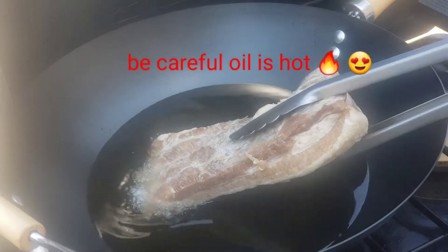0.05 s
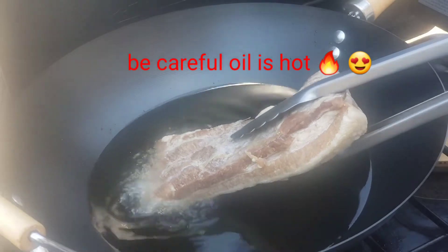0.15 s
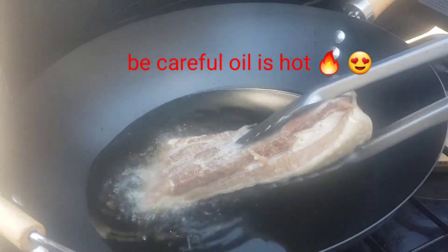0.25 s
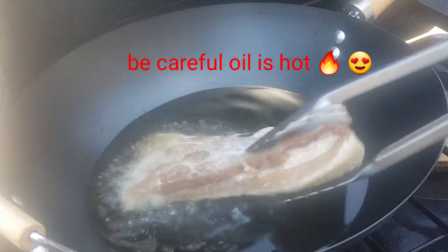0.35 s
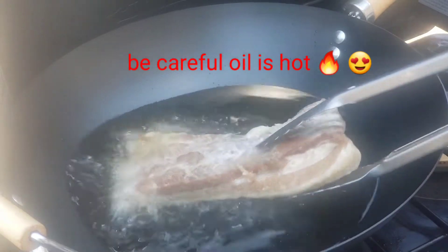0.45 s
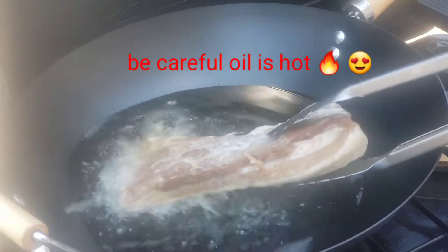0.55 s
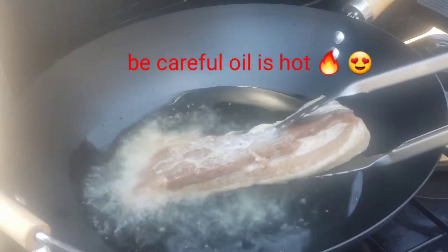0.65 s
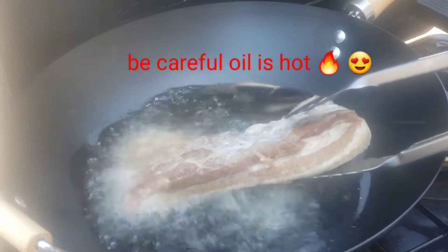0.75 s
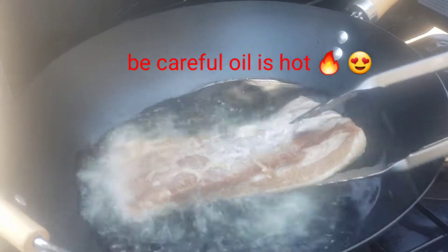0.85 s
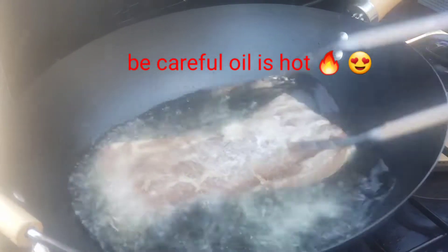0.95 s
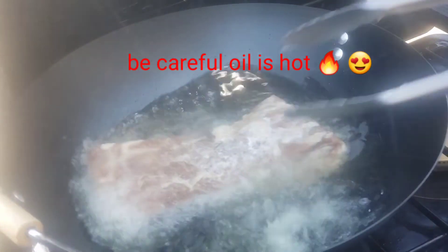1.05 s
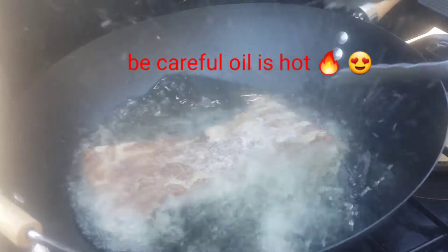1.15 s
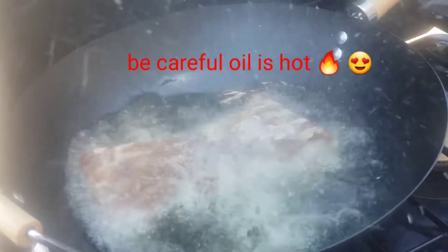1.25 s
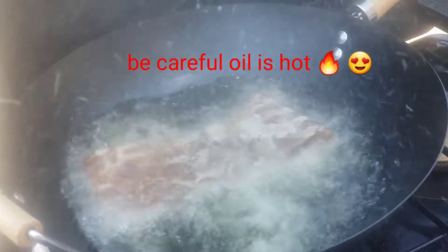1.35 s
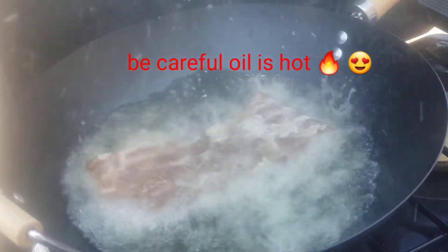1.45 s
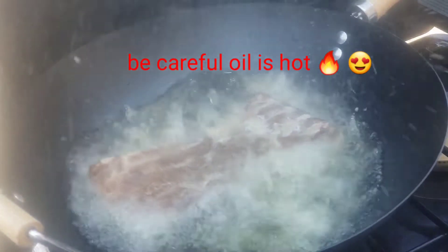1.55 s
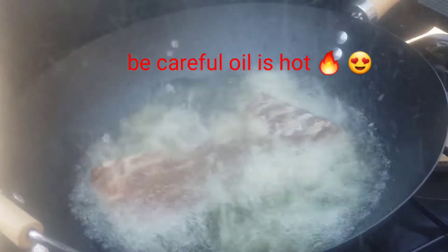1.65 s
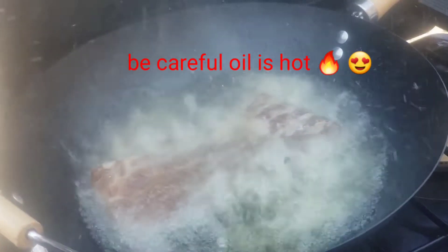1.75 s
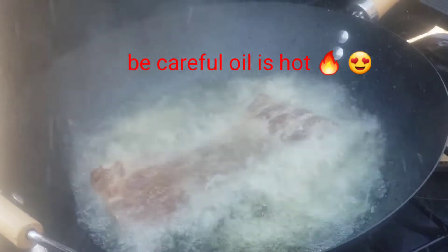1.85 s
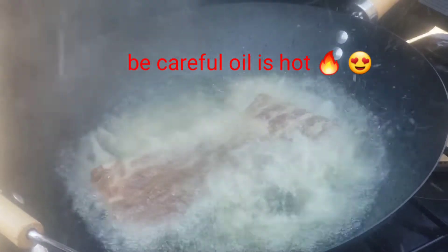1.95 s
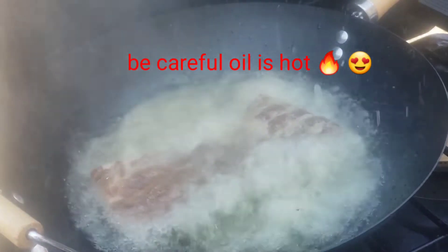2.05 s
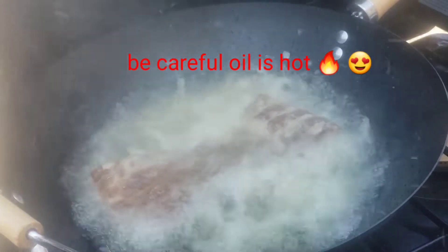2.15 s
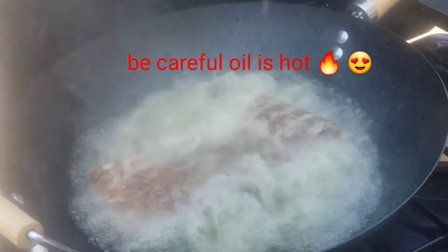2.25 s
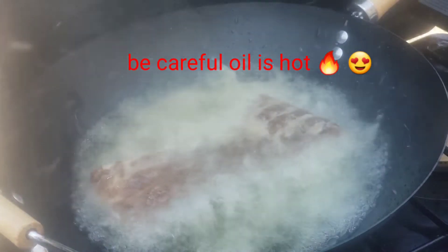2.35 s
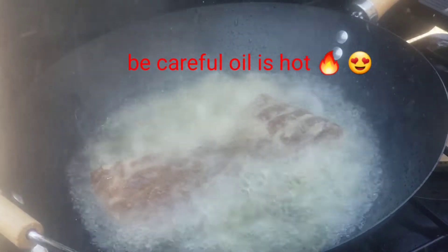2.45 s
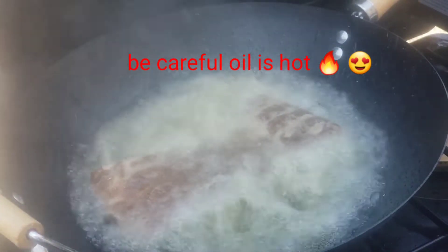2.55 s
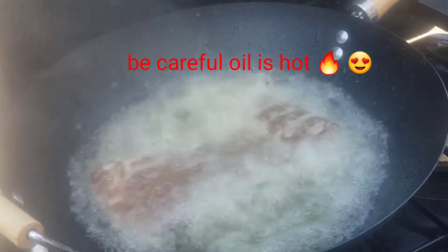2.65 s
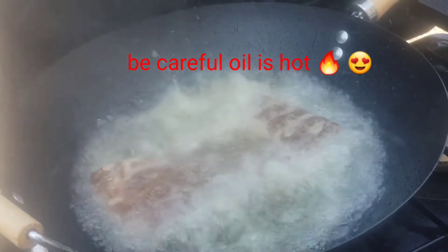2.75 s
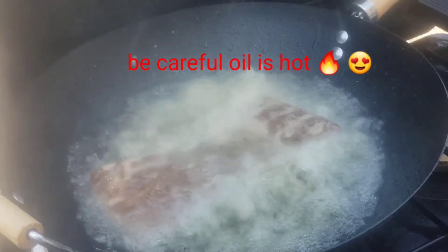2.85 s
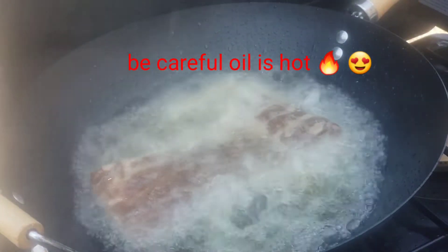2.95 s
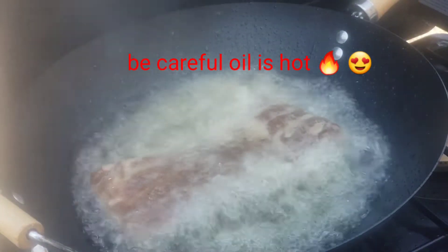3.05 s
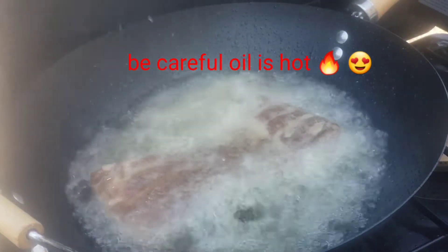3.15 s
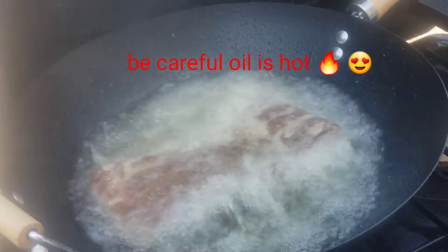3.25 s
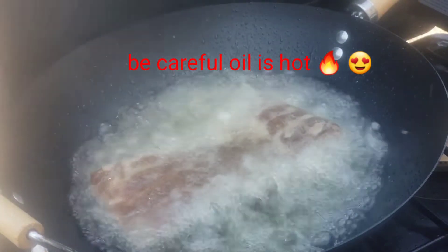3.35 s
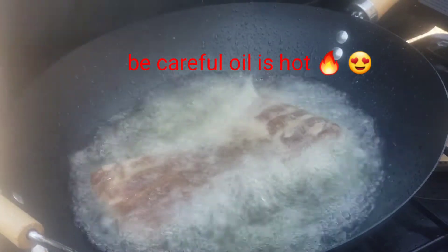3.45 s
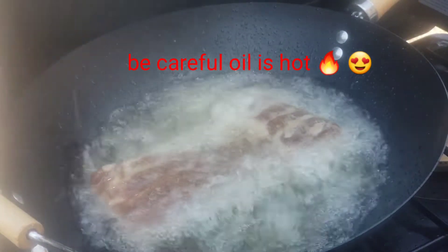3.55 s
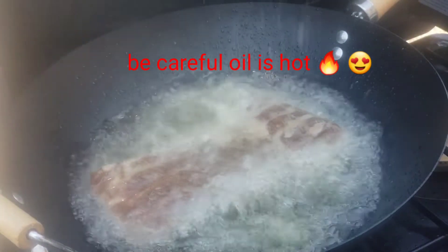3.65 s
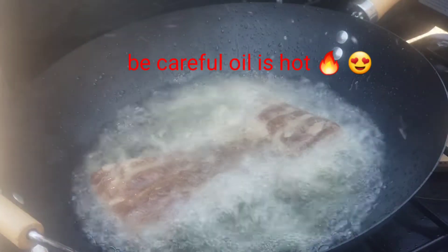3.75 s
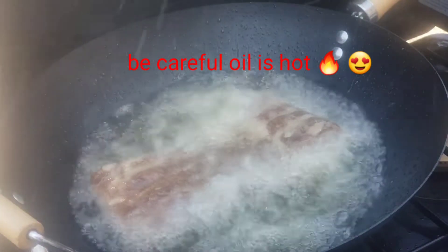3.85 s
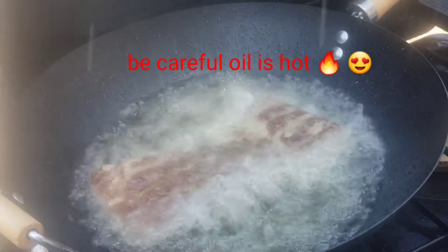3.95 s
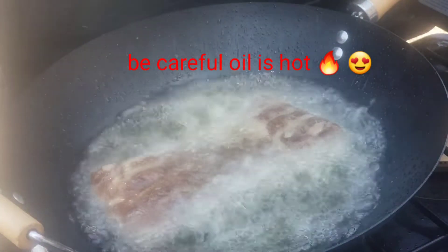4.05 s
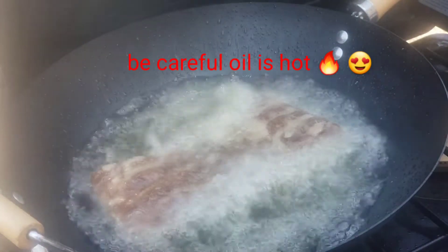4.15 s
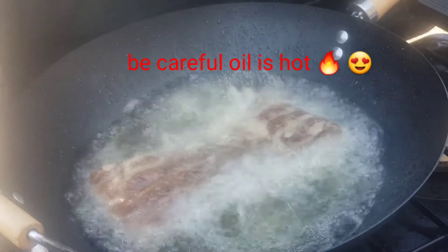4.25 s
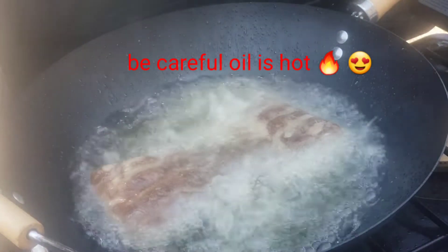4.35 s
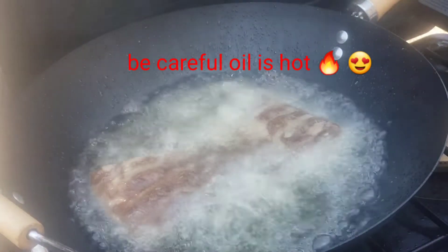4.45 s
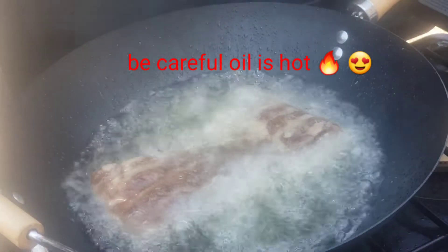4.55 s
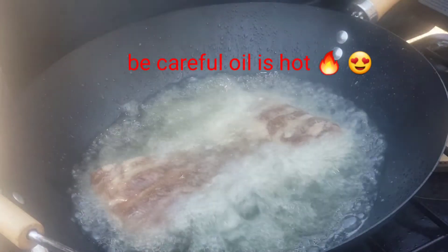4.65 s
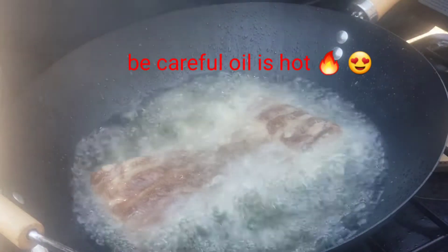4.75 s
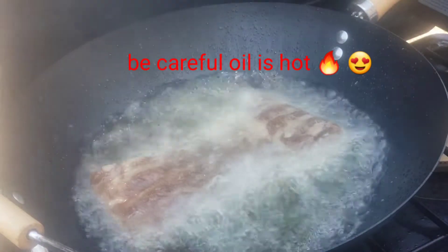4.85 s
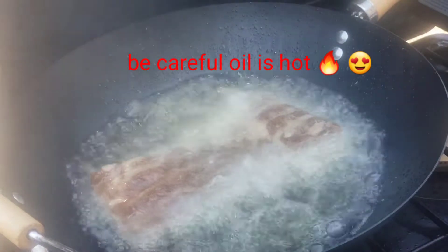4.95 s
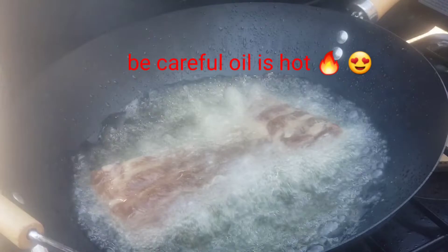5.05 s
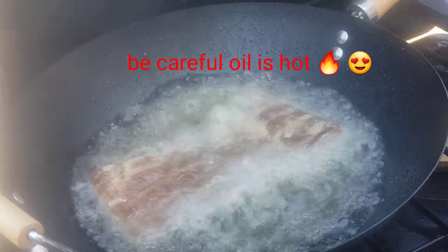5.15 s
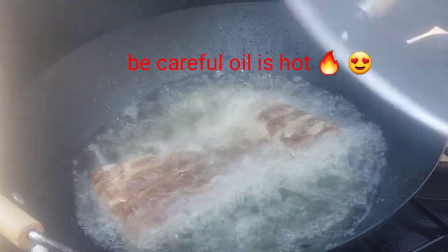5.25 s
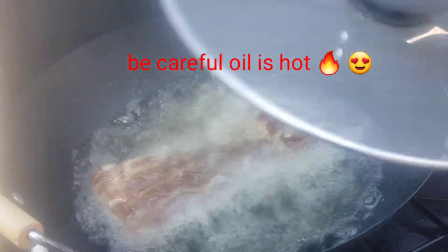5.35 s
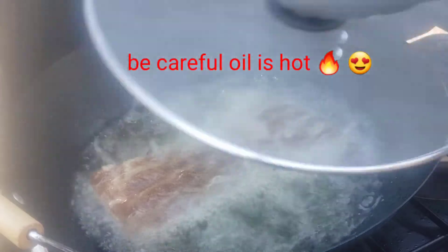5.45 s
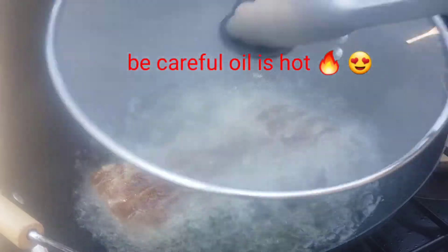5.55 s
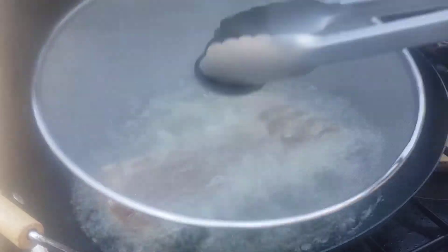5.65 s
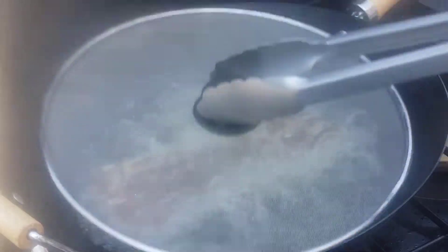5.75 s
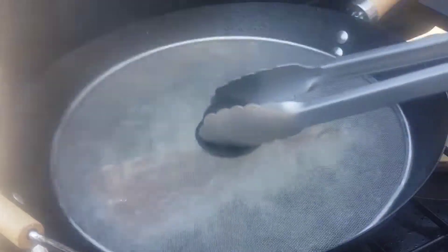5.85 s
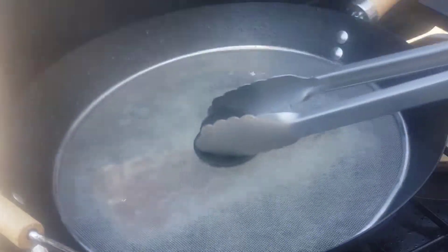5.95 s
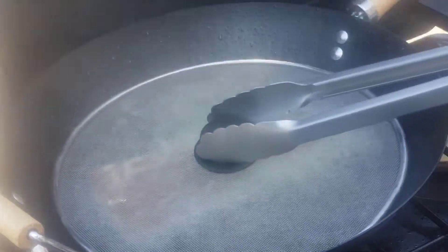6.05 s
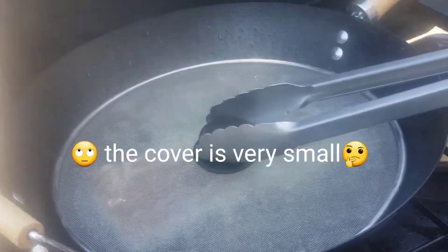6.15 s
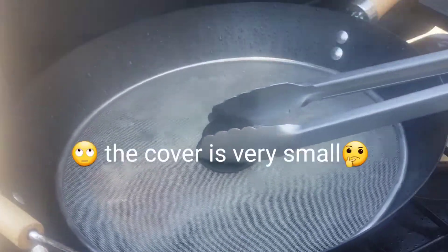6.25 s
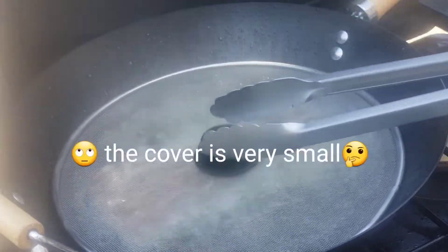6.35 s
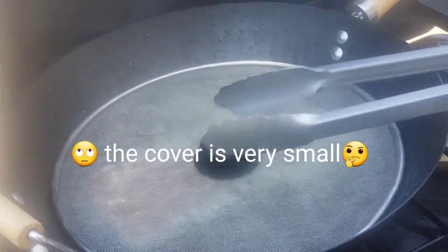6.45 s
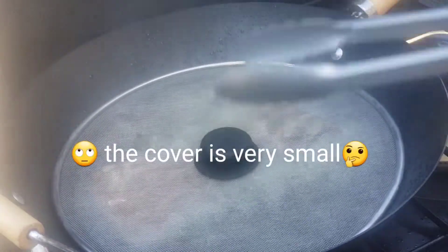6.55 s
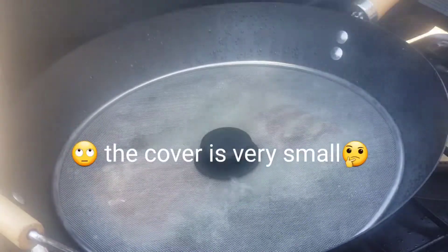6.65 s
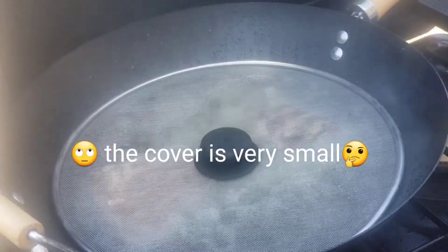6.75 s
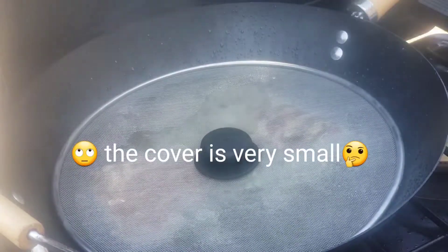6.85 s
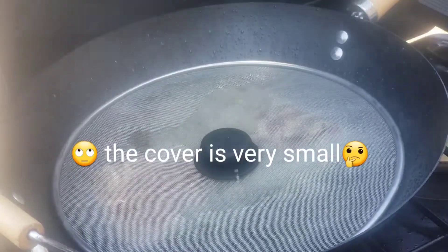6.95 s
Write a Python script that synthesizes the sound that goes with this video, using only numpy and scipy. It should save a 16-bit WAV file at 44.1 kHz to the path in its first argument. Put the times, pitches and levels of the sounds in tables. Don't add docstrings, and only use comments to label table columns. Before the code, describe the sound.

Close frying sound in a steel wok, with almost no room around it. At 0 s there is a modest fizz; from about 0.25 s wet meat touching the oil crackles sharply, and by 0.75 s the sizzle swells into a dense, bright roar. From 1.1 to 3 s it stays loud and turbulent: steady hiss, countless fine snaps, hard spitting cracks around 1.3, 1.8, 2.2 and 2.7 s, and hollow, mid-pitched bubbling and gurgling below the oil. The hardest cracks jolt and briefly squash the sound. Around 2.7 s the hiss begins thinning, and after 3.3 s single snaps and short hollow pops stand apart over a softening fizz. From 5 to 7 s it is a quiet, irregular crackle, with faint low air puffs as a lid arrives near 6 s, and a somewhat stronger crack around 6.5 s. The bowl adds a slight metallic ring.

```python
import sys
import numpy as np
from scipy import signal
from scipy.fft import rfft, irfft, next_fast_len
from scipy.io import wavfile
from scipy.ndimage import uniform_filter1d, minimum_filter1d, map_coordinates

SR = 44100
rng = np.random.default_rng(int(sys.argv[2]) if len(sys.argv) > 2 else 0)


def gain_from_decibels(decibels):
    exponent = np.asarray(decibels, float) / 20
    return 10 ** exponent


def wav_record(signal):
    frames = np.transpose(np.atleast_2d(signal))
    bounded = np.clip(frames, -1, 1)
    quanta = np.round(bounded * 32767).astype(np.int16)
    wavfile.write(sys.argv[1], SR, quanta)


N = 308259

# time_s, surface_db, under_db
BOILING = [(0, -27, -35), (.27, -21.5, -39), (.56, -20.5, -22.5), (.76, -16.5, -20), (1.13, -19, -22),
           (1.58, -18.5, -23.5), (2, -19.5, -25), (2.32, -21, -25), (2.53, -20.5, -24.5), (2.7, -25, -20.5),
           (3.08, -24, -28.5), (3.72, -27.5, -31), (4.17, -29, -33.5), (4.7, -31.5, -35), (5.4, -30, -35),
           (5.68, -28.5, -43), (6.0, -31, -36), (6.99, -31, -40.5)]
# frequency_hz, density_db (per Hz)
FIZZ_COLOUR = [(150, -19.5), (600, -14.5), (1100, -6), (2000, -1.5), (4400, -1.5), (7500, -8), (10500, -16),
               (14700, -23), (16500, -37)]
# frequency_hz, gain_db
SPRAY_COLOUR = [(800, -25), (2000, 5.5), (4000, 3.5), (8000, 10), (11000, 3.5), (15000, -5.5), (16500, -36)]
# start_s, peak_db, pitch_hz
DROPS = [(0.1693, -4.5, 6600), (0.277, 5, 8450), (0.3839, -4, 7440), (0.5568, 14, 9800),
         (1.1762, 10, 6050), (1.274, 23, 9440), (1.3572, 15, 7100), (1.4983, 9, 7650),
         (1.6746, 1, 7240), (1.802, 16, 6200), (1.8211, 5, 7250), (1.9541, 15, 7250),
         (2.0132, -7, 8300), (2.2047, 10, 8500), (2.2776, -8, 6720), (2.311, 1, 4970),
         (2.4003, -2, 5800), (2.5125, 2, 5430), (2.5342, -5, 6700), (2.613, -3.5, 8450),
         (2.6996, 14, 4650), (2.7792, 12, 7530), (2.8052, 8, 5900), (2.8294, -7, 6800),
         (2.8534, 10, 6450), (2.884, 9, 8300), (2.956, 4, 6960), (3.1228, -5, 6700), (3.169, -3, 8300),
         (3.2496, -7, 7060),
         (3.386, -3, 6000), (3.408, -4, 6450), (3.4365, 12, 7100), (3.5082, -16, 4660),
              (3.974, -5, 6300), (4.029, 0, 8190), (4.037, -3, 8050), (4.1287, -5.5, 6570),
              (4.2064, -4, 7200), (4.2896, -11, 5000), (4.474, -4, 7150), (4.5417, 3, 8300),
              (4.6365, -13, 7100), (4.7861, -2, 7800), (4.9251, -7.5, 6700), (5.2484, -10, 3630),
              (5.359, -5, 8400), (5.4056, -8.5, 7600), (5.5195, -3, 8700), (5.5813, -11.5, 6700),
              (5.826, -8, 5520), (6.0096, -6, 6120), (6.027, -6.5, 7860), (6.1729, -1, 7600),
              (6.3244, -10, 6200), (6.394, -3, 8270), (6.5035, 7, 6160), (6.6871, -3.5, 5300),
              (6.766, -4, 7360), (6.7781, 1, 8800),
         (3.2157, -11, 7890), (3.2346, -3, 8600), (3.3455, -3, 5140), (3.6986, -10, 7290),
               (3.958, -11.5, 6600), (4.0237, -8, 6620), (4.2718, -11, 6580), (4.388, -21, 3500),
               (4.644, -11, 4340), (4.7535, -13.5, 5200), (5.086, -22, 5260), (5.197, -14, 6340),
               (5.2918, -15.5, 5230), (5.4737, -19, 6880), (5.4998, -7, 4200), (5.555, -9.5, 9050),
               (5.7903, -14, 7400), (5.8869, -11.5, 5400), (5.983, -9, 7360), (6.192, -17, 9390),
               (6.518, -13, 5970), (6.603, -12.5, 5600), (6.631, -13, 3800), (6.72, -14, 7900),
               (6.729, -14, 4994), (6.757, -19, 5070), (6.7819, -5, 8600), (6.9416, -22, 7000)]
# time_s, pitch_hz
BUBBLE_PITCH = [(0, 2600), (.5, 2300), (1.1, 1930), (1.5, 1240), (3, 1170), (3.6, 1585), (7, 1593)]
# time_s, level_db (over the other bubbles)
HOLLOW_LEVEL = [(.4, -26), (.6, -4), (1.3, 0), (3.1, 1.5), (3.15, -16), (7, -23)]
# start_s, peak_db, pitch_hz
POCKETS = [(0.261, -2, 2930), (0.2947, 1, 2220), (0.4074, -2, 2280), (0.4217, -4, 2500),
           (0.4487, -5.5, 1870), (0.4623, -3, 2350), (0.5781, -6.5, 1200), (0.7487, -2, 1210),
           (0.7675, 10, 2500), (0.7796, -1, 1325), (0.871, -4, 2500), (0.9143, -7, 1570),
           (1.0772, -4, 1210), (1.1721, 1, 2550), (1.623, -7, 1050), (1.6387, -6, 2580),
           (1.8908, -10.5, 647), (1.9505, 1, 1420), (1.9624, -4.5, 1060), (1.9922, -7, 1350),
           (2.613, -1.5, 1060), (2.7236, -10, 1080), (2.775, 4, 1140), (3.0697, -5.5, 930),
           (3.0964, -7.5, 1700), (3.2552, -8, 633), (3.2728, -9.5, 1490), (3.4894, -10.5, 1400),
           (3.5171, -7.5, 1460), (3.667, -9.5, 835),
           (3.9872, -7.5, 1150), (4.146, -12, 1450), (4.2912, -12.5, 960), (4.3168, -7, 637),
                (4.3314, -5, 534), (4.517, -11.5, 1020), (4.6036, -6.5, 733), (4.7983, -11.5, 1210),
                (4.823, -15, 645), (4.9614, -13, 1250), (5.0608, -7.5, 1187), (5.1057, -10, 1830),
                (5.192, -6.5, 2900), (5.2471, -8.5, 1170), (5.4232, -12, 956), (5.4488, -6, 2620),
                (5.4852, -8.5, 1095), (5.5486, -11.5, 2150), (5.7856, -12, 1100), (5.9998, -11, 1680),
                (6.0905, -15.5, 1090), (6.1716, -11, 1340), (6.408, -7, 728), (6.4657, -7.5, 1330),
                (6.5269, -2, 1017), (6.6285, -12, 1830), (6.6862, -1.5, 1250), (6.8087, -5, 1170),
                (6.884, -10, 2700), (6.9507, -5.5, 1900),
           (3.3832, -7, 1830), (3.548, -11, 1290), (3.628, -19, 1230), (3.7532, -16, 1390),
                 (4.357, -12, 1500), (4.386, -17, 1500), (4.5948, -13, 1170), (3.8620, -17, 1220),
                 (4.0527, -18, 707), (4.1106, -13.5, 1800), (4.413, -21, 680), (4.551, -16, 1240),
                 (4.6616, -16, 1900), (4.776, -11, 2470), (4.8445, -14, 1730), (4.896, -9.5, 3580),
                 (5.009, -12, 1770), (5.1263, -11, 2330), (5.222, -22, 1220), (5.2846, -17, 1060),
                 (5.6073, -13, 2500), (5.647, -16.5, 1390), (5.7862, -12.5, 764), (5.8815, -13, 1540),
                 (6.136, -18, 1690), (6.355, -17, 960), (6.3656, -5.5, 3500), (6.635, -13, 2270),
                 (6.658, -20, 1090), (6.774, -13.5, 1050)]
# centre_hz, width_hz, level_db
BOWL_MODES = [(561.7, 20, -4), (1170, 216, 4), (1870, 150, -9), (2600, 100, -23.5), (4356, 91, 0.5)]
# delay_s, level_db
BOWL_ECHOES = [(.0004, -17), (.0008, -10.5), (.0015, -38), (.0029, -4), (.0042, -20)]
# start_s, level_db
JOLTS = [(0.541, -43), (1.17, -42), (1.267, -43), (1.353, -46), (2.04, -42), (2.399, -40), (2.855, -30),
         (3.248, -48), (3.436, -47), (4.038, -36.5), (4.128, -48), (4.786, -46), (5.519, -43), (6.009, -42)]
# frequency_hz, density_db (per Hz)
RUMBLE_COLOUR = [(18, -11), (30, -10.5), (60, -0.5), (100, -5.5), (140, -8), (250, -31), (400, -60)]
# centre_s, level_db, spread_s
LID_PUFFS = [
    (5.35, -75, 0.18),
    (6.0, -62, .06),
    (6.25, -66, .12),
    (6.65, -60, 0.2),
]

SUNK_S, SPENT_S, TURN_S = 1.12, 2.75, 0.16


def boil_surface(surge_db):
    fizz_db, _ = boiling_db()
    hiss = coloured_noise(FIZZ_COLOUR)
    snaps = swarm(count=10000, hz=[(0, 6320)], octaves=0.73, cycles=8.9, spread_db=5, cap_db=19.5, size=110)
    snaps = unit(coloured(snaps, SPRAY_COLOUR))
    hiss_db = fizz_db - 3 + 0.2 * (fizz_db + 23.5) + 1.13 * surge_db
    snaps_db = fizz_db - 1.0 + 0.08 * surge_db
    return gain_from_decibels(hiss_db) * hiss + gain_from_decibels(snaps_db) * snaps


def cracks():
    small = lesser(boiling_db()[0], count=110, over_db=15, spread_db=10, hz=[(0, 7000)], octaves=0.5)
    s, db, hz = np.vstack([DROPS, small]).T
    db = db + np.clip(db + 5, 0, 3.5)
    t = np.arange(700) / SR
    spray_envelope = gain_from_decibels(-13 - 60 * t / 0.006) + gain_from_decibels(-23 - 60 * t / 0.025)
    spray = scatter(s, db, spray_envelope)
    burst = rings(s, db + 16.0, hz, 5.15 / hz, 0.59, 0, size=160)
    edge = rings(s, db - 32, 4.3 * hz, 3 / hz, 0.78, 0, size=80)
    return burst + edge + spray


def boil_below(surge_db):
    _, bubble_db = boiling_db()
    gurgle_db = driven_db(base_db=-45.5, sunk_db=12.5, follows=0.36)
    bubbles = swarm(count=3000, hz=BUBBLE_PITCH, octaves=0.48, cycles=9.6, spread_db=5.5, cap_db=11.5, size=600)
    hollow = swarm(count=1000, hz=[(0, 1260), (3, 1123), (7, 1200)], octaves=0.11, cycles=24.0,
                   spread_db=1.0, cap_db=13.5, size=900)
    gurgle = swarm(count=1200, hz=[(0, 549)], octaves=0.27, cycles=4.1, spread_db=0.5, cap_db=6.0, size=900)
    hollow_db = np.interp(np.arange(N) / SR, *np.transpose(HOLLOW_LEVEL))
    bubbling = bubbles + gain_from_decibels(hollow_db - 4) * hollow
    return gain_from_decibels(bubble_db - 3 + 0.6 * surge_db) * bubbling + gain_from_decibels(gurgle_db - 1.5) * gurgle


def pops():
    small = lesser(boiling_db()[1], count=120, over_db=14.5, spread_db=7.5, hz=BUBBLE_PITCH, octaves=0.587)
    s, db, hz = np.vstack([POCKETS, small]).T
    t60 = 0.018 * (1200 / hz) ** 1.13
    sound = rings(s, db, hz, t60, 0.44, 0.034, size=2000)
    sound += rings(s, db - 19.0, 0.84 * hz, 4 * t60, 0.68, 0, size=4000)
    # octaves from the pocket's pitch, level dB
    for octave, piece_db in [(-0.5, -10), (0.5, -4), (1.2, -5), (2.1, -9.5)]:
        detune, delay, strength = rng.standard_normal((len(s), 3)).T
        pitch = hz * 2 ** (octave + 0.19 * detune)
        start = s + 0.0008 * np.abs(delay)
        piece_t60 = 0.76 * t60 * np.sqrt(hz / pitch)
        sound += rings(start, db + piece_db + 2.4 * strength, pitch, piece_t60, 0.53, 0.015, size=1200)
    t = np.arange(700) / SR
    return sound + scatter(s, db, gain_from_decibels(-37 - 60 * t / 0.029))


def bowl(x, ring_db, echo_db):
    def response(f):
        echoes = sum(gain_from_decibels(db) * np.exp(-2j * np.pi * f * s) for s, db in BOWL_ECHOES)
        modes = 0
        for k, (centre, width, db) in enumerate(BOWL_MODES):
            damping = 1j * f * width
            modes = modes + (-1) ** k * gain_from_decibels(db) * damping / (centre * centre - f * f + damping)
        return 1 + gain_from_decibels(echo_db) * echoes + gain_from_decibels(ring_db) * modes
    return filtered(x, response)


def jolts():
    t = np.arange(N) / SR
    push = 0
    for s, db in JOLTS:
        push = push - gain_from_decibels(db + 26) * np.maximum(t - s, 0) / 0.0033 * np.exp(-np.abs(t - s) / 0.0089)
    return filtered(push, lambda f: high_pass(f, corner_hz=72, order=4))


def air_rumble():
    t = np.arange(N) / SR
    air = gain_from_decibels(driven_db(base_db=-73.5, sunk_db=9.5, follows=0.58))
    for centre, db, spread in LID_PUFFS:
        air = air + gain_from_decibels(db) * np.exp(-((t - centre) / spread) ** 2)
    air_db = 20 * np.log10(air)
    return gain_from_decibels(air_db + 5.0 + 4.4 * wobble(11)) * coloured_noise(RUMBLE_COLOUR)


def boiling_db():
    s, surface, under = np.transpose(BOILING)
    t = np.arange(N) / SR
    return np.interp(t, s, surface), np.interp(t, s, under)


def driven_db(base_db, sunk_db, follows):
    t = np.arange(N) / SR
    sunk = (np.tanh((t - SUNK_S) / TURN_S) - np.tanh((t - SPENT_S) / TURN_S)) / 2
    surface_db, _ = boiling_db()
    return base_db + sunk_db * sunk + follows * (surface_db - surface_db.mean())


def lesser(bed_db, count, over_db, spread_db, hz, octaves):
    u = rng.random((count, 3))
    s = np.sort(u[:, 0]) ** 1.5 * N / SR
    db = bed_db[(s * SR).astype(int)] + over_db - spread_db * u[:, 1]
    pitch = np.interp(s, *np.transpose(hz)) * 2 ** (octaves * (2 * u[:, 2] - 1))
    return np.transpose([s, db, pitch])


def swarm(count, hz, octaves, cycles, spread_db, cap_db, size):
    u = rng.random((count, 2))
    g = rng.standard_normal((count, 2))
    s = u[:, 0] * N / SR
    pitch = np.interp(s, *np.transpose(hz)) * 2 ** (octaves * g[:, 0])
    db = np.minimum(-spread_db * np.log(u[:, 1] + 1e-9), cap_db)
    t60 = cycles * np.exp(0.31 * g[:, 1]) / pitch
    return unit(rings(s, db, pitch, t60, 0.18, 0.078, size))


def rings(s, db, hz, t60, rise, glide, size):
    t = np.arange(size) / SR
    s, db, hz, t60 = (np.reshape(v, (-1, 1)) for v in (s, db, hz, t60))
    phase = 2 * np.pi * np.clip(hz, 20, SR / 3) * t * (1 + glide * t / t60)
    onset = 1 - np.exp(-t * hz / rise)
    wave = -gain_from_decibels(db - 60 * t / t60) * np.sin(phase) * onset
    return placed(s, wave)


def scatter(s, db, envelope):
    noise = gain_from_decibels(db[:, None]) * envelope * rng.standard_normal((len(s), len(envelope)))
    return coloured(placed(s[:, None], noise), SPRAY_COLOUR)


def placed(s, waves):
    at = (s * SR).astype(int) + np.arange(waves.shape[1])
    return np.bincount(at.ravel(), waves.ravel(), N + SR)[:N]


def unit(x):
    return x / np.sqrt(np.mean(x ** 2) + 1e-20)


def wobble(rate):
    knots = rng.standard_normal(int(7 * rate) + 9)
    return map_coordinates(knots, [np.arange(N) * rate / SR])


def filtered(x, response):
    m = next_fast_len(N + SR // 2)
    return irfft(rfft(x, m) * response(np.fft.rfftfreq(m, 1 / SR)), m)[:N]


def coloured(x, colour):
    hz, db = np.transpose(colour)
    return filtered(x, lambda f: gain_from_decibels(np.interp(np.log(f + 1), np.log(hz + 1), db)))


def coloured_noise(colour):
    return unit(coloured(rng.standard_normal(N), colour))


def high_pass(f, corner_hz, order):
    return (1j * f / (corner_hz + 1j * f)) ** order


def scene():
    surge_db = 1.61 * wobble(12) + 2.43 * wobble(70)
    above = bowl(boil_surface(surge_db) + cracks(), ring_db=-9.5, echo_db=-21)
    below = bowl(boil_below(surge_db) + pops(), ring_db=4, echo_db=-24.0)
    return (above + below)[None]


def top_cut(x):
    return signal.sosfilt(signal.butter(12, 16810, fs=SR, output="sos"), x)


def record(dry):
    need = np.minimum(1, 0.86 / (np.abs(dry[0]) + 1e-9))
    gain = uniform_filter1d(minimum_filter1d(need, size=331), size=331)

    def band(f):
        return high_pass(f, corner_hz=166, order=3) / (1 + (f / 15750) ** 90)

    held = filtered(dry[0] * gain, band)
    mix = held + jolts() + air_rumble()
    return top_cut(mix[None])


dry = scene()
out = record(dry)
wav_record(out)
```